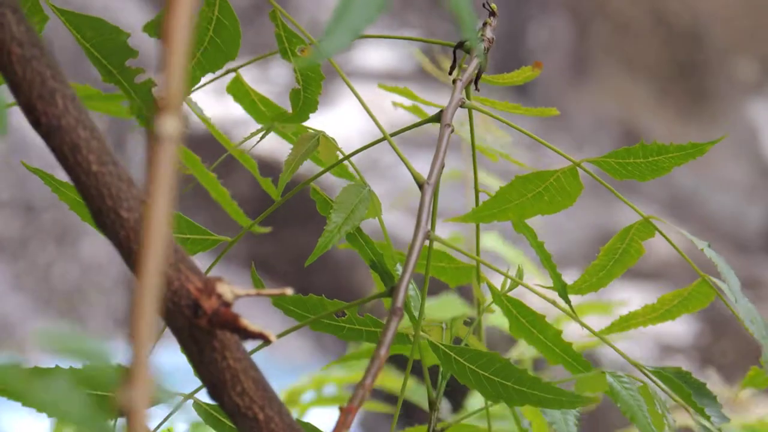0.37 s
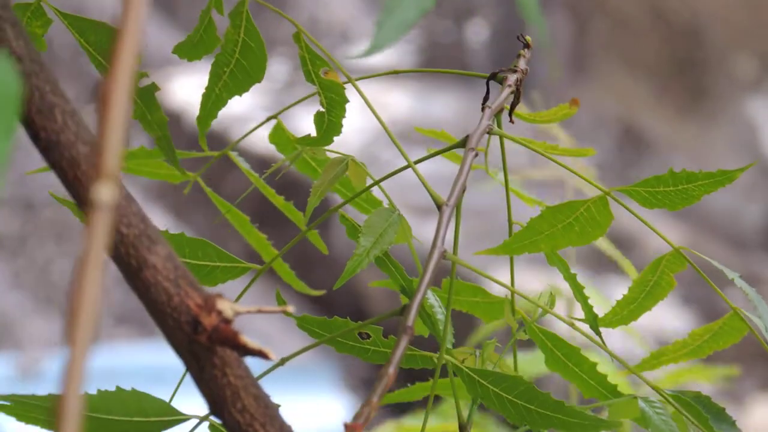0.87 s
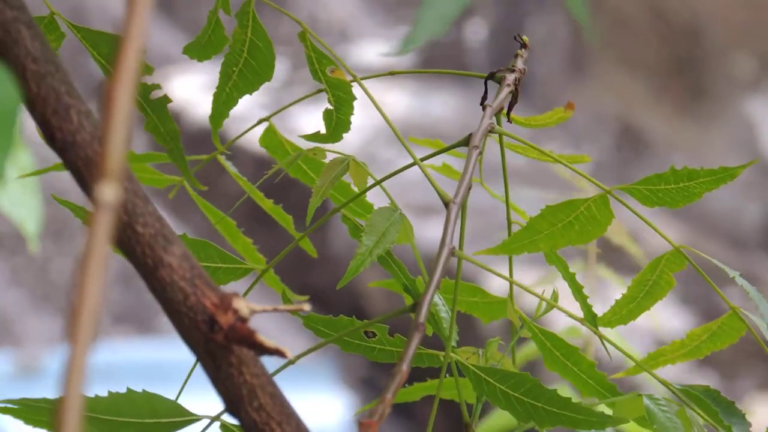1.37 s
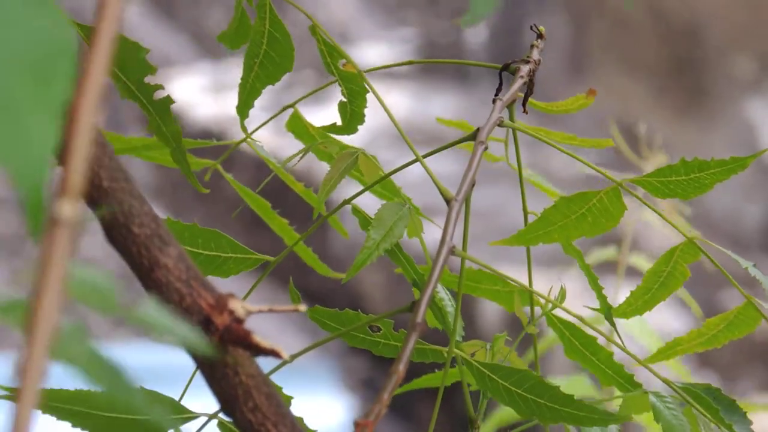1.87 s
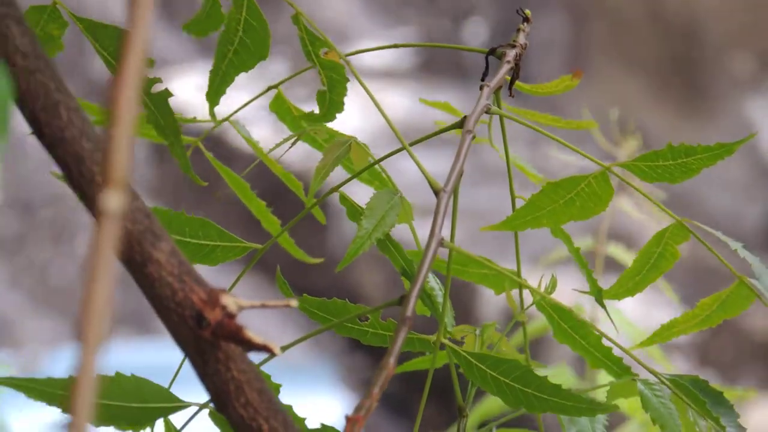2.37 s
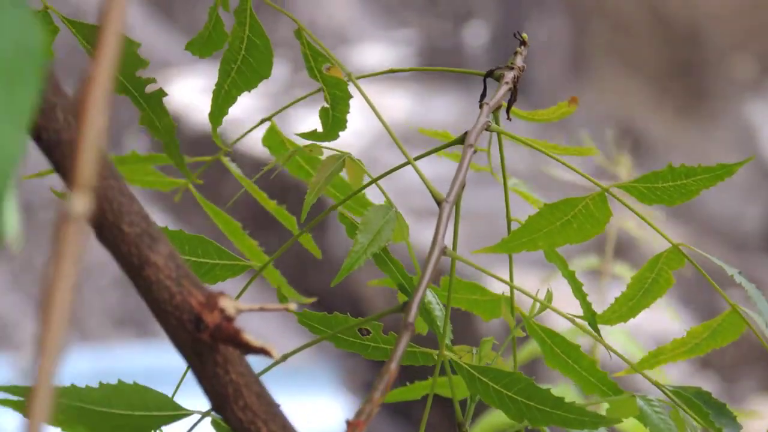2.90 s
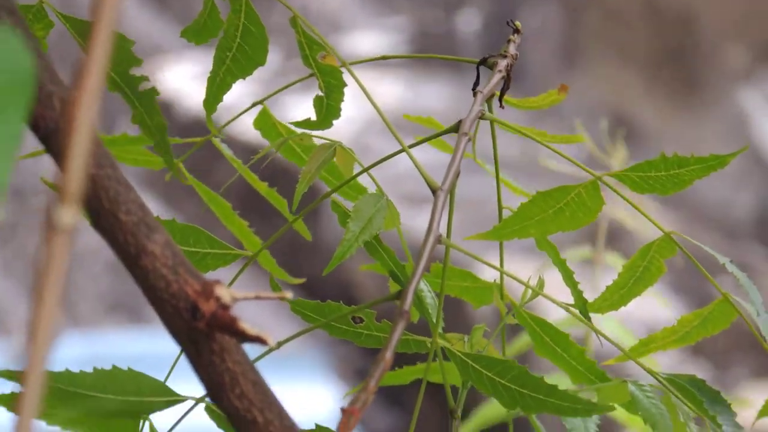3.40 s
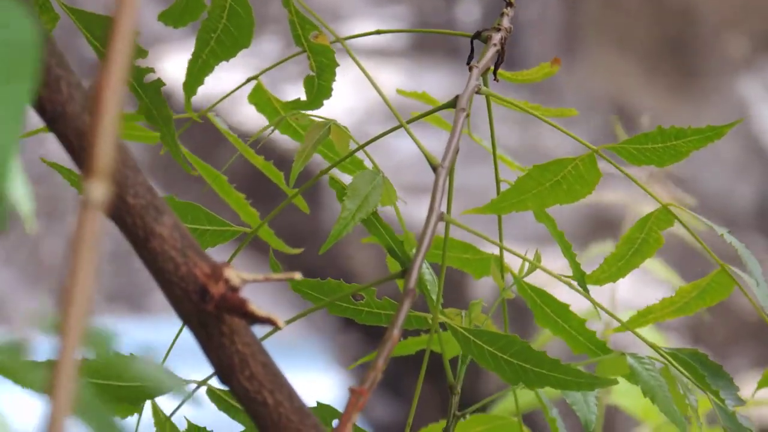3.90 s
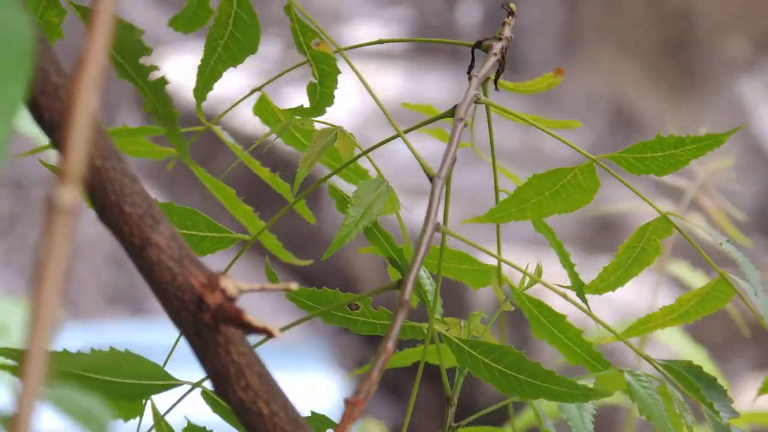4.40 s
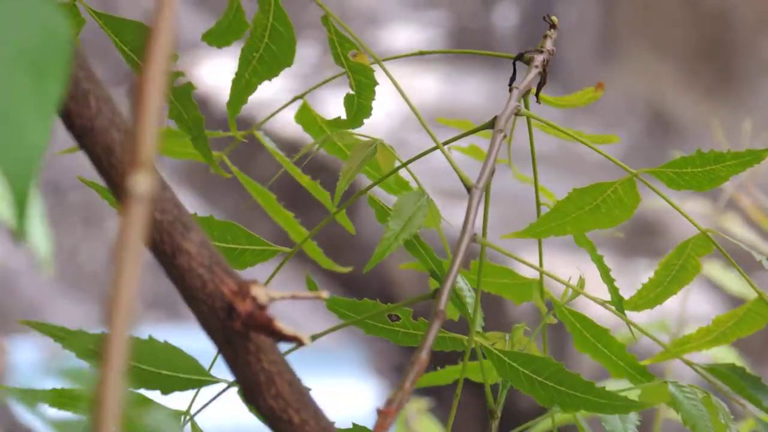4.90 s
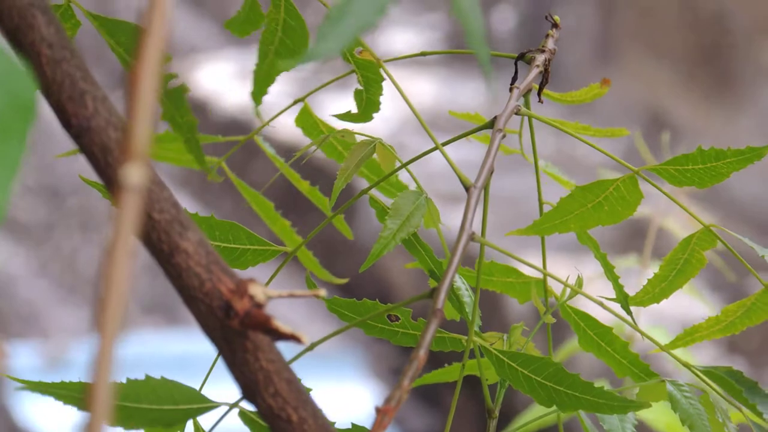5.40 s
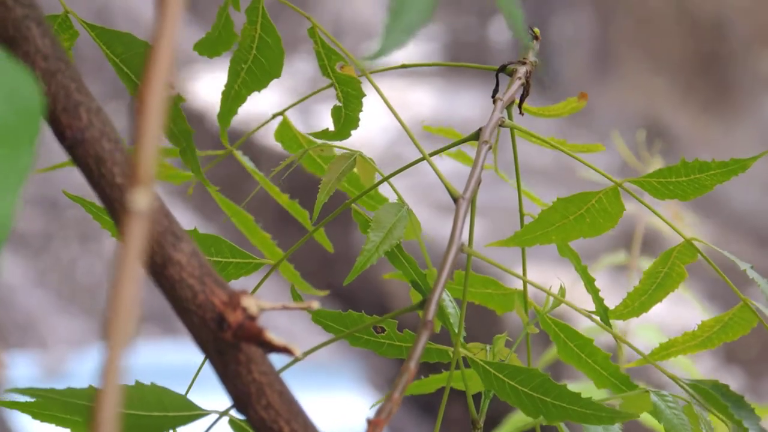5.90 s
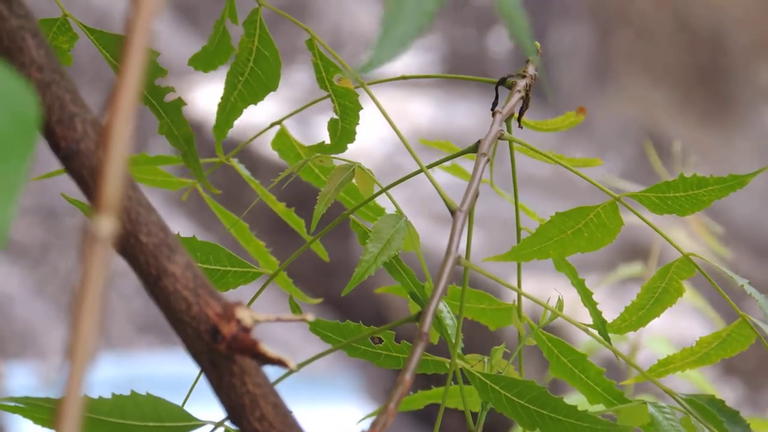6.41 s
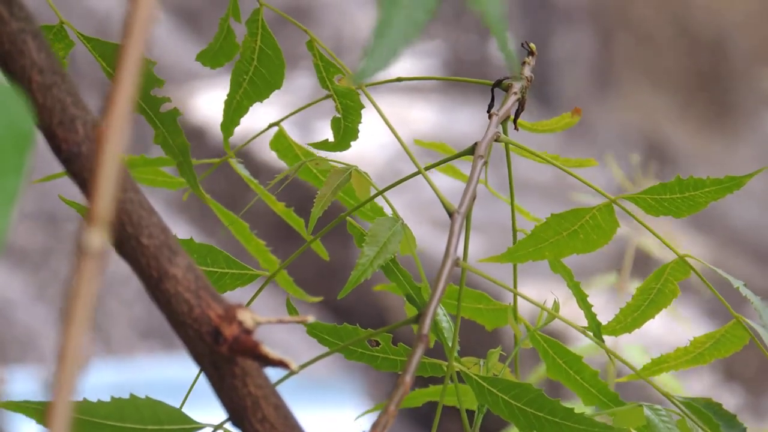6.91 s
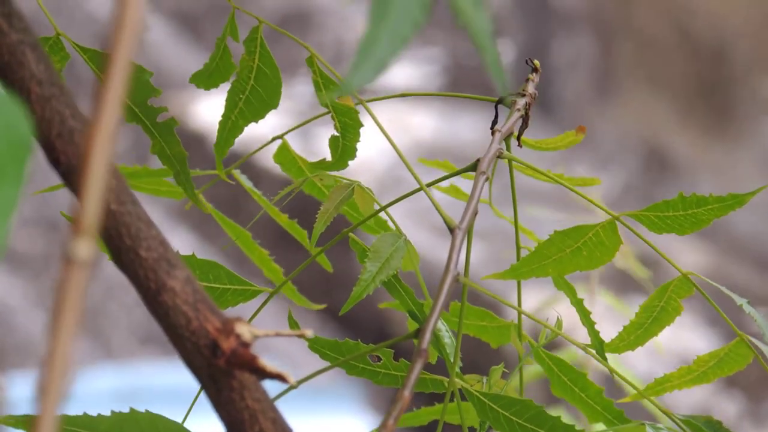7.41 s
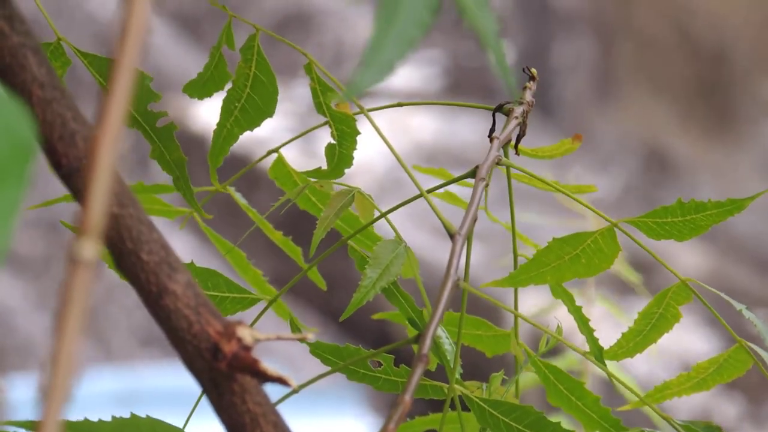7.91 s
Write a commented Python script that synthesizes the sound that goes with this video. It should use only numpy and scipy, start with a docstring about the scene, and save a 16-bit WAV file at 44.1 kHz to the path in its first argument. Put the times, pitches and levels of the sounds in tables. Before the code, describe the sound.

Outdoors in garden foliage, two faint hoarse calls come from far away, then a nearby small bird gives one steeply falling note and repeats a sharp chip plus upward whistle eleven times. Walls throw the clear tones back. The song stops near six seconds, leaving soft town wash and low hums. Stereo microphone, close to the bird.

```python
"""A small songbird close by in garden foliage: one falling opening note, then eleven pairs of a sharp falling
chip and a rising whistle, each a nearly pure tone with weak overtones, thrown back by walls and a diffuse tail.
Behind it are hoarse distant calls (pulses through a resonance), a thin far bird (a swept sine), leaf ticks
(decaying noise), low hums that swell now and then (wavering sines) and the far wash of a town (random spectra).
Two spaced microphone ports hear it all."""
import sys
import numpy as np
from scipy import signal
from scipy.fft import irfft
from scipy.io import wavfile
from scipy.ndimage import uniform_filter1d

SR = 44100
rng = np.random.default_rng(int(sys.argv[2]) if len(sys.argv) > 2 else 0)


def to_linear_factor(level_db):
    """Convert decibel levels (scalar or array-like) to linear amplitude factors."""
    exponent = np.asarray(level_db, float) / 20
    return 10 ** exponent


def put_to_file(sound):
    """Save the sound as 16-bit audio at rate SR, in the file named by the first command-line argument."""
    columns = np.atleast_2d(sound).T  # one column per channel
    safe = np.clip(columns, -1, 1)
    whole_steps = np.round(safe * 32767)
    wavfile.write(sys.argv[1], SR, whole_steps.astype(np.int16))


N = 354034  # samples


def evened(x):
    """Normalization: scales a signal to rms 1."""
    return x / np.sqrt(np.mean(x ** 2) + 1e-20)


def read(points, hz):
    """Logarithmic frequency scale: interpolates each column of a spectrum along it."""
    f, *values = np.transpose(points)
    return np.squeeze([np.interp(np.log(hz + 1), np.log(f + 1), v) for v in values])


def add(mix, s, sound):
    """Superposition: sums a sound into the mix from time s on."""
    part = mix[max(round(s * SR), 0):][:len(sound)]
    part += sound[:len(part)]


def follow(rows):
    """Continuous modulation: joins the rows of a contour sample by sample, with rounded corners."""
    s, *columns = np.transpose(rows)
    s = np.maximum.accumulate(s)
    t = np.arange(rows[0][0], rows[-1][0], 1 / SR)
    return [uniform_filter1d(np.interp(t, s, c), size=45, mode="nearest") for c in columns]


def drift(count, width):
    """Low-pass random fluctuation: noise of rms 1, averaged twice over width samples."""
    noise = rng.standard_normal(max(count, 20000))[:count]
    smooth = uniform_filter1d(noise, int(width))
    return evened(uniform_filter1d(smooth, int(width)))


# overtones of the voice: multiple of the pitch, level/dB before beak and strain
VOICE_OVERTONES = [(2, -25.5), (3, -31.5), (4, -36), (5, -30.5), (6, -34)]
# filtering of the overtones by the beak: f/Hz, gain/dB
BEAK_GAIN = [(4500, -19), (6500, -12), (8400, -6.5), (9500, -17.5), (10800, 3), (12200, -5), (13000, 7),
             (13800, 11)]


def syrinx(hz, level_db, over_db=0., half_db=-91.0, rasp_db=-90.):
    """Source and filter: a nearly pure membrane tone, whose weak overtones flutter and pass the beak."""
    turn = 2 * np.pi * np.cumsum(hz * (1 + 0.0033 * drift(len(hz), 77))) / SR
    tone = np.sin(turn)
    for k, db in VOICE_OVERTONES:
        flutter = 1 + 0.83 * drift(len(hz), 60)
        heard = k * hz < 17000
        overtone_db = db + over_db + read(BEAK_GAIN, k * hz)
        tone += to_linear_factor(overtone_db) * flutter * np.sin(k * turn) * heard
    # period doubling: uneven beats add half multiples of the pitch
    halves = 0.45 * np.sin(turn / 2) + 0.58 * np.sin(3 * turn / 2) + 2.3 * np.sin(5 * turn / 2)
    tone += to_linear_factor(half_db) * halves
    rasp = np.diff(rng.standard_normal(20000), n=2)[:len(hz)]
    tone += to_linear_factor(rasp_db) * rasp  # bright air noise of a snapped note
    return to_linear_factor(level_db) * tone


# contour of the opening, a high hold, a steep fall and a low hold: t/s, f/Hz, level/dB at the bird
OPENING_CONTOUR = [(1.243, 5590, -43), (1.251, 5450, -34.5), (1.266, 5340, -28.5), (1.282, 5490, -27.5),
                   (1.292, 5450, -29), (1.31, 4630, -18.5), (1.345, 2655, -18.5), (1.358, 2164, -23.5),
                   (1.376, 2040, -26), (1.417, 2200, -20), (1.426, 2200, -36)]


def opening_note():
    """Nonlinear strain: overtones grow with pitch above an easy one, up to a limit, as half-pitch lines fade."""
    strain_db, strain_db_per_octave, easy_hz, strain_top_db = -15, 34.5, 2200, 25.5
    half_start_db, half_fade_db_per_s = -1, -380
    out = np.zeros(N)
    hz, level_db = follow(OPENING_CONTOUR)
    over_db = np.minimum(strain_db + strain_db_per_octave * np.log2(hz / easy_hz), strain_top_db)
    half_db = half_start_db + half_fade_db_per_s * np.arange(len(hz)) / SR
    add(out, OPENING_CONTOUR[0][0], syrinx(hz, level_db, over_db, half_db, rasp_db=-28))
    return out


# the chips: t/s, level/dB added to the contour, length/s
CHIP_EVENTS = [(1.5502, -6, 0.015), (1.93, -5.5, 0.018), (2.3224, -5, 0.017), (2.7075, -6.5, 0.017),
               (3.091, -7.5, 0.02), (3.475, -7, 0.018), (3.88, -9.5, 0.018), (4.2777, -8, 0.018),
               (4.6888, -8, 0.018), (5.1454, -7.5, 0.016), (5.5912, -8.5, 0.02)]
# contour of one chip: share of the length, factor on the reference pitch, level/dB
CHIP_CONTOUR = [(-.13, 1.086, -68), (-.06, 1.038, -6.5), (.04, .99, -10), (.22, .97, -4), (.45, .86, -7),
                (.62, .735, -10), (.8, .59, -14.5), (.98, .45, -25), (1.04, 0.34, -34)]


def chips():
    """Rapid frequency modulation: one steep downward sweep, whose pitch sinks as the song goes on."""
    reference_hz, sag_hz_per_s = 5065, 50
    out = np.zeros(N)
    for s, db, length in CHIP_EVENTS:
        factor, shape_db = follow(np.multiply(CHIP_CONTOUR, (length, 1, 1)))
        hz = (reference_hz - sag_hz_per_s * (s - CHIP_EVENTS[0][0])) * factor
        start = s + CHIP_CONTOUR[0][0] * length
        add(out, start, syrinx(hz, db + shape_db, over_db=9.0, rasp_db=-27.5))
    return out


# the whistles: start t/s, middle of the climb t/s, level/dB added to the contour, top f/Hz,
# end of the top note t/s after the middle (at least 0.028 s is sung)
WHISTLE_EVENTS = [(1.67, 1.743, -14.5, 3010, 0.055), (2.06, 2.136, -13.5, 3000, 0.039),
                  (2.436, 2.52, -13, 3000, 0.032), (2.829, 2.907, -13.5, 2978, 0.038),
                  (3.206, 3.288, -13, 3000, 0.029), (3.592, 3.68, -14, 3000, 0.038),
                  (3.993, 4.08, -14, 2990, 0.021), (4.389, 4.478, -14, 2986, 0.0319),
                  (4.797, 4.885, -14.5, 2970, 0.031), (5.257, 5.343, -14, 2967, 0.032),
                  (5.721, 5.805, -13.5, 3000, 0.032)]
# soft lead-in of the first whistle: t/s from the start, factor on the top pitch, level/dB
WHISTLE_LEAD_IN = [(-.003, .63, -25), (.001, .68, -15.5), (.009, .712, -10), (.02, .69, -13.5),
                   (.031, .65, -21.5)]
# climb of the whistle: t/s from the middle, factor on the top pitch, level/dB
WHISTLE_CLIMB = [(-.046, .665, -21.5), (-.036, .715, -9), (-.018, .778, -11), (-.004, .85, -4),
                 (.007, .888, -5), (.014, .935, -1.5), (.022, 0.98, 0.5)]


def whistles():
    """Upward frequency modulation: a soft lead-in that sinks and softens over the song, a climb and a hold."""
    lead_sag_per_s, lead_fade_db_per_s = 0.00583, 1.65  # the sag is in factor on pitch
    out = np.zeros(N)
    for start, middle, db, top_hz, end in WHISTLE_EVENTS:
        end = max(end, .028)
        hold = [(end, 1, -1.5), (end + 0.022, .99, -36)]
        sung = start - WHISTLE_EVENTS[0][0]
        lead = np.add(WHISTLE_LEAD_IN, (start, -lead_sag_per_s * sung, -lead_fade_db_per_s * sung))
        climb = np.add(list(WHISTLE_CLIMB) + hold, (middle, 0, 0))
        rows = np.vstack([lead, climb])
        factor, shape_db = follow(rows)
        add(out, rows[0, 0], syrinx(top_hz * factor, db + shape_db))
    return out


def songbird():
    """Superposition: the opening note, the chips and the whistles of one voice."""
    return opening_note() + chips() + whistles()


# colour of the way from the twig to the ports: f/Hz, left level/dB, right level/dB
PATH_COLOUR = [(1870, 4, -8.5), (2200, -0.5, -11.5), (2314, -9, -1.5), (2416, 1, 6.5), (2502, -1, 6.5),
               (2627, 1.5, -3), (2820, 3.5, -4), (3000, 4.5, 2), (2970, 3, -0.5), (4400, 0, 0.5),
               (5260, 3, -2), (8000, 3.5, -0.5), (13700, -3.5, -15.5)]
# decay of the diffuse tail: f/Hz, reverberation time t60/s
TAIL_DECAY = [(1500, 0.51), (3000, 0.52), (5000, 0.52), (9000, 0.42)]
# arrivals, a row for the left and one for the right port, the direct one first: t/ms in each column
ARRIVAL_TIMES = [(0, 1.83, 3.6, 5.5, 8.5, 10.2, 28.5), (.005, 1.48, 3.505, 5.33, 8.1, 14.8, 33)]
# levels of the same arrivals, in the same rows and columns: level/dB
ARRIVAL_LEVELS = [(-.5, -6, -12, -14, -31, -10.5, -11.5), (-.5, -17, -4.5, -10.5, -4.5, -20.5, -8.5)]


def garden(x):
    """Reflection and reverberation: strong arrivals off walls, then a tail that changes as leaves move."""
    tail_db = -4.5
    bins = np.fft.rfftfreq(4096, 1 / SR)
    # 512 samples of delay leave room ahead of the direct sound; they are cut off at the end
    path = np.exp(-2j * np.pi * bins * 512 / SR) * to_linear_factor(read(PATH_COLOUR, bins))
    delays = np.exp(-2j * np.pi * np.multiply.outer(ARRIVAL_TIMES, bins) / 1000)
    early = (to_linear_factor(np.array(ARRIVAL_LEVELS))[:, :, None] * delays).sum(axis=1)
    tails = np.zeros((2, N))
    for k in range(3):
        # sparse taps of random sign, one in every 20 samples
        taps = np.zeros((2, 30000))
        at = np.arange(260, 29980, 20) + rng.integers(0, 20, (2, 1486))
        np.put_along_axis(taps, at, rng.choice([-1., 1.], at.shape), 1)
        hz, t, z = signal.stft(taps, SR, nperseg=256)
        decay = to_linear_factor(-60 * t / read(TAIL_DECAY, hz)[:, None])
        tail = signal.istft(z * decay, SR, nperseg=256)[1]
        tail /= np.linalg.norm(tail[0])
        # the three tails take turns; their summed power stays constant
        share = np.sqrt(2 / 3) * np.cos(np.pi * (np.arange(N) / SR * .45 + k / 3))
        tails += signal.oaconvolve((x * share)[None], tail, axes=1)[:, :N]
    near = signal.oaconvolve(x[None], irfft(early * path), axes=1)
    far = signal.oaconvolve(tails, irfft(path), axes=1)
    return (near + to_linear_factor(tail_db) * far)[:, 512:N + 512]


# small ticks among the leaves: t/s, level/dB before decay and side balance, middle of the band f/Hz
LEAF_TICKS = [(.125, -39.5, 8000), (4.865, -31.5, 1250)]


def leaf_ticks():
    """Impulsive excitation: a band of noise that dies away exponentially."""
    out = np.zeros(N)
    t = np.arange(600) / SR
    for s, db, hz in LEAF_TICKS:
        band = [hz * 0.65, min(hz * 1.4, SR / 2.1)]
        puff = signal.lfilter(*signal.butter(1, band, "band", fs=SR), rng.standard_normal(len(t)))
        add(out, s, to_linear_factor(db) * evened(puff) * np.exp(-t / 0.0076))
    return out


# hoarse far calls: start t/s, length t/s, pitch f/Hz, level/dB before fades and side balance, throat f/Hz
HOARSE_CALLS = [(0.05, 0.42, 215.6, -45.5, 1340), (0.761, .42, 200.6, -49.5, 1470)]


def far_calls():
    """Formant resonance: jittered pulses, as harmonics weighted by one throat resonance, with a rough level."""
    out = np.zeros(N)
    for s, length, pitch_hz, db, throat_hz in HOARSE_CALLS:
        u = np.arange(0, 1, 1 / (length * SR))  # share of the call
        hz = pitch_hz * (1 + 0.044 * np.sin(np.pi * u) + 0.026 * drift(len(u), 290))
        turn = 2 * np.pi * np.cumsum(hz) / SR
        voice = sum(np.exp(-((k * hz - throat_hz) / 420) ** 2) * np.sin(k * turn) for k in range(3, 12))
        rasp = 1 + 0.75 * drift(len(u), 120)
        add(out, s, to_linear_factor(db) * evened(voice * rasp) * signal.windows.tukey(len(u), .55))
    return out


# notes of the thin far bird: loudest moment t/s, level/dB before fluctuation and side balance
THIN_NOTES = [(.5, -52), (4.82, -48), (7.665, -48.5)]
# contour of its one note: t/s from the loudest moment, f/Hz, level/dB
THIN_CONTOUR = [(-.09, 7050, -22), (-.075, 7150, -4), (-.035, 6800, -11), (0, 6840, 0), (.04, 6720, -6),
                (.075, 6100, -6), (.1, 5850, -10), (.11, 5800, -25)]


def far_bird():
    """Frequency modulation: a falling sine whose level fluctuates at random."""
    out = np.zeros(N)
    hz, shape_db = follow(THIN_CONTOUR)
    for s, db in THIN_NOTES:
        level_db = db + shape_db + 3.0 * drift(len(hz), 200)
        tone = to_linear_factor(level_db) * np.sin(2 * np.pi * np.cumsum(hz) / SR)
        add(out, s + THIN_CONTOUR[0][0], tone)
    return out


def hum(hz, db, count):
    """Narrow-band fluctuation: a low tone that wavers in pitch and level."""
    turn = 2 * np.pi * np.cumsum(hz * (1 + 0.00597 * drift(count, 2460))) / SR
    return np.sqrt(2) * to_linear_factor(db + 0.53 * drift(count, 1200)) * np.sin(turn)


# lasting faint hums: mean f/Hz, mean rms level/dB
LASTING_HUMS = [(388, -57.5), (165.3, -54.5)]
# their swells: start t/s, length t/s, mean f/Hz, mean rms level/dB between the fades
HUM_SWELLS = [(.45, 0.33, 167.7, -57), (1.752, 0.51, 388, -49.5), (4.3, 0.32, 386.6, -41),
              (5.33, 0.15, 169.6, -43), (6.619, .4, 388, -44), (7.7, 0.33, 175.8, -41)]


def hums():
    """Amplitude modulation: two faint low tones, as of far engines, joined by short swells."""
    out = sum(hum(hz, db, N) for hz, db in LASTING_HUMS)
    for s, length, hz, db in HUM_SWELLS:
        count = round(length * SR)
        add(out, s, hum(hz, db, count) * signal.windows.tukey(count, .6))
    return out


# relative spectrum of the wash: f/Hz, level/dB
WASH_SPECTRUM = [(12, -40), (20, -9.5), (82, -3.5), (114, -5.5), (160, 4.5), (200, -8), (260, 0), (340, -7),
                 (500, -3), (700, -6), (1100, -12.5), (2060, -17.5), (4000, -20), (7960, -23),
                 (13100, -27.5), (14600, -34)]
# course of its treble over the rest: t/s, level/dB
TREBLE_COURSE = [(0, 2.4), (1.2, 1.8), (5.9, 2.6), (6.5, 0.8), (8.03, 0.8)]
# likeness of left and right: f/Hz, correlation from -1 to 1
PORT_LIKENESS = [(60, 0.95), (150, 0.9), (380, 0.92), (940, 0.74), (2360, -0.098), (5920, -0.096),
                 (14800, -0.017)]
# balance of the ports: f/Hz, left over right level/dB
PORT_BALANCE = [(60, -3), (240, 0), (940, -1.0), (3740, 1), (14800, 3.5)]


def town():
    """Diffuse-field coherence: random spectra of far traffic and air, alike in the bass, unrelated in the treble."""
    wash_db = -44  # before treble course, patches and balance
    frames, hz = N // 256 + 5, np.fft.rfftfreq(1024, 1 / SR)
    a, b, c, d, patches = rng.standard_normal((frames, 513, 5)).T
    patches = uniform_filter1d(patches, size=10, axis=0)
    patches = evened(uniform_filter1d(patches, size=16, axis=1))
    t = np.arange(frames) * 256 / SR
    treble = np.clip(np.log2(hz / 900 + 1e-9), 0, 1)[:, None]  # rises from 900 to 1800 Hz
    level_db = wash_db + treble * np.interp(t, *np.transpose(TREBLE_COURSE))
    same = np.clip(read(PORT_LIKENESS, hz), -1, 1)[:, None]
    left = a + 1j * b
    right = same * left + np.sqrt(1 - same ** 2) * (c + 1j * d)
    lean = read(PORT_BALANCE, hz)[:, None] / 2
    colour = to_linear_factor(read(WASH_SPECTRUM, hz))[:, None]
    gain = colour * to_linear_factor(level_db + 1.26 * patches + np.array([lean, -lean]))
    wash = signal.istft(np.array([left, right]) * gain, nperseg=1024, noverlap=768)[1][:, :N]
    return 2.12 * wash / np.linalg.norm(colour)


def scene():
    """Superposition: the near bird in its garden over the far sounds."""
    to_ports = to_linear_factor(np.array([[1.5], [-1.5]]))  # the small sounds lean to the left
    small_sounds = leaf_ticks() + far_calls() + far_bird()
    return garden(songbird()) + small_sounds * to_ports + hums() + town()


def band_limit(x):
    """A steep low-pass at the top of the band."""
    return signal.sosfilt(signal.butter(12, 15440, fs=SR, output="sos"), x)


def record(dry):
    """Band limitation: a linear-phase low-pass bounds the finished mix."""
    edge_hz = 14270
    lowpass = signal.firwin(511, edge_hz, window=("kaiser", 8), fs=SR)
    limited = signal.oaconvolve(dry, lowpass[None], "same")
    return band_limit(limited)


dry = scene()
out = record(dry)
put_to_file(out)
```